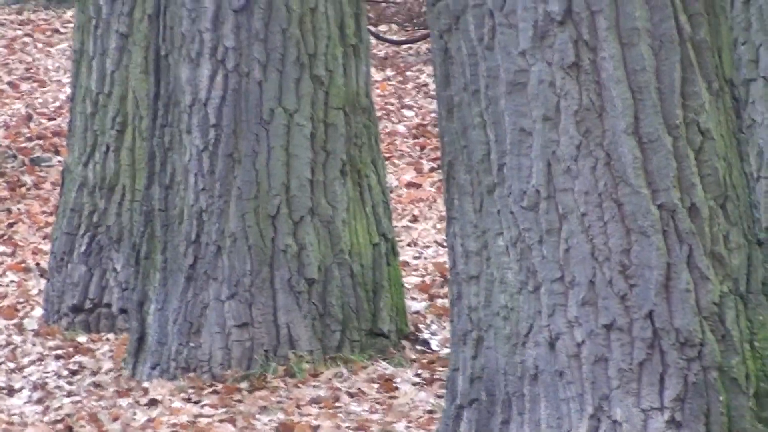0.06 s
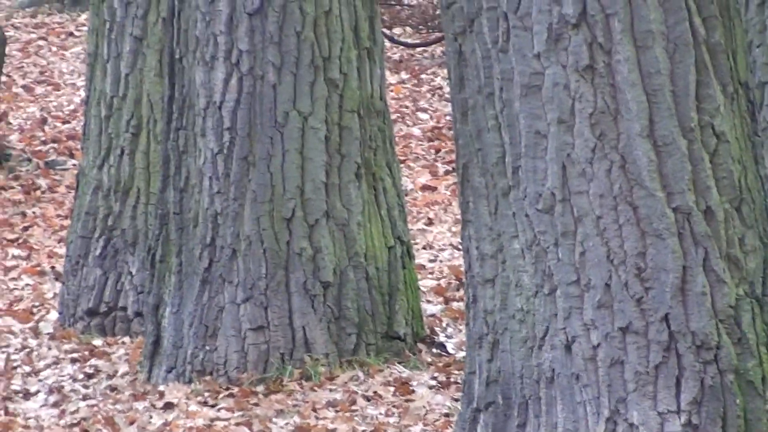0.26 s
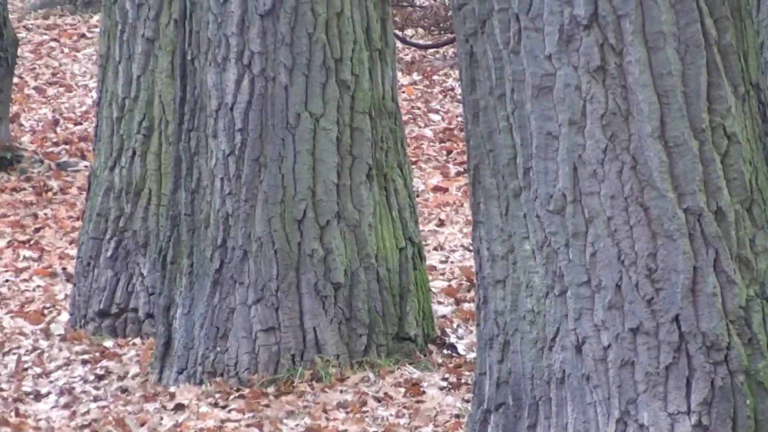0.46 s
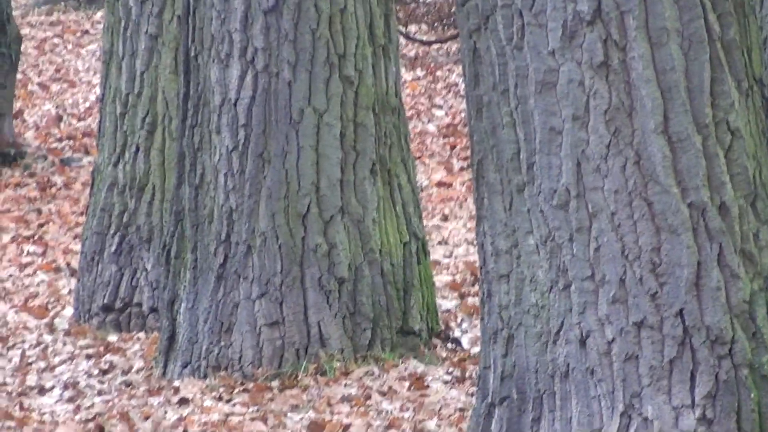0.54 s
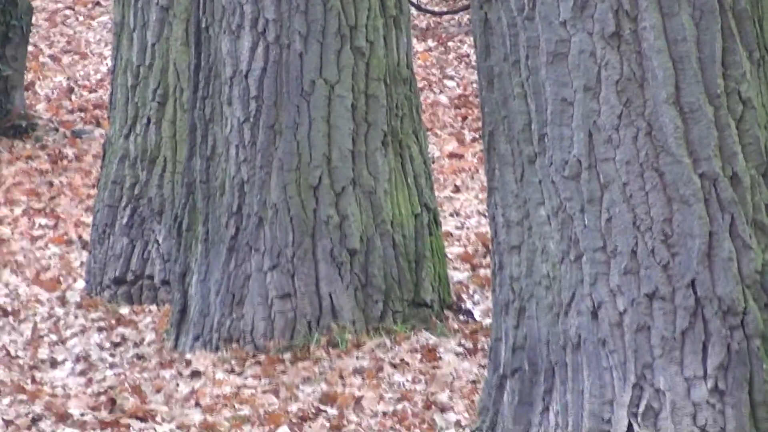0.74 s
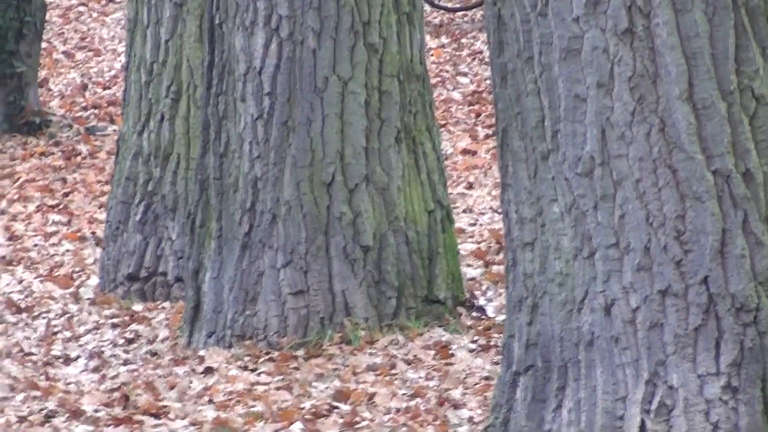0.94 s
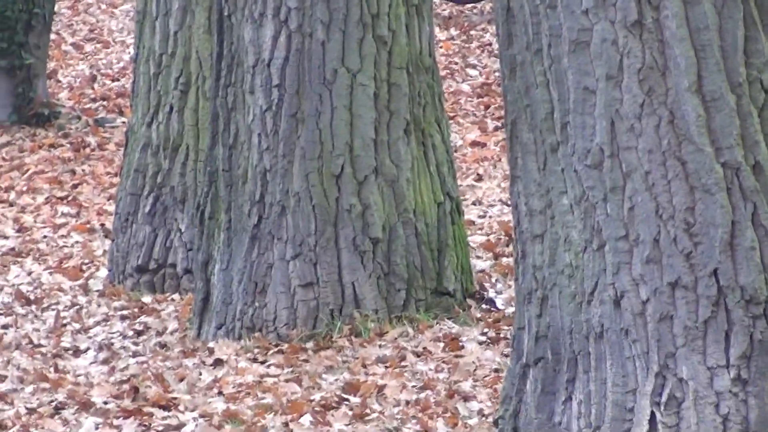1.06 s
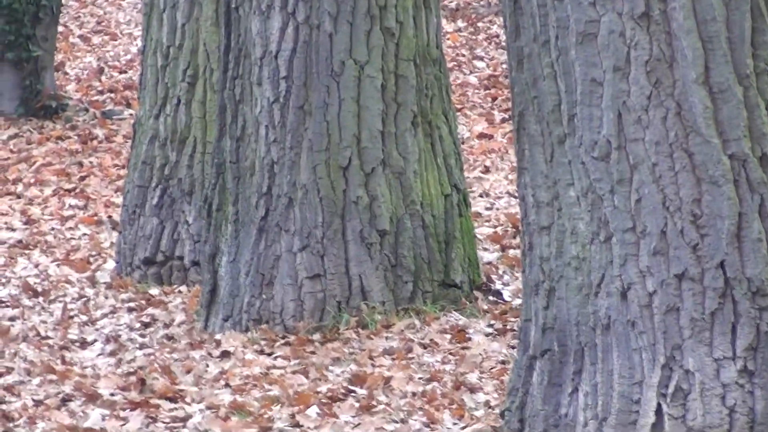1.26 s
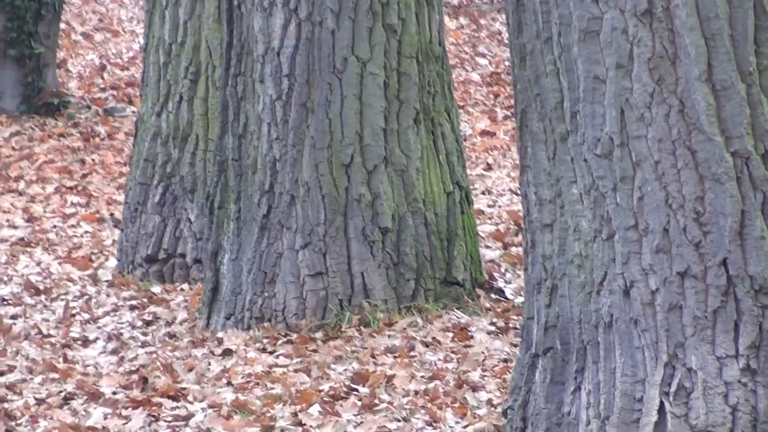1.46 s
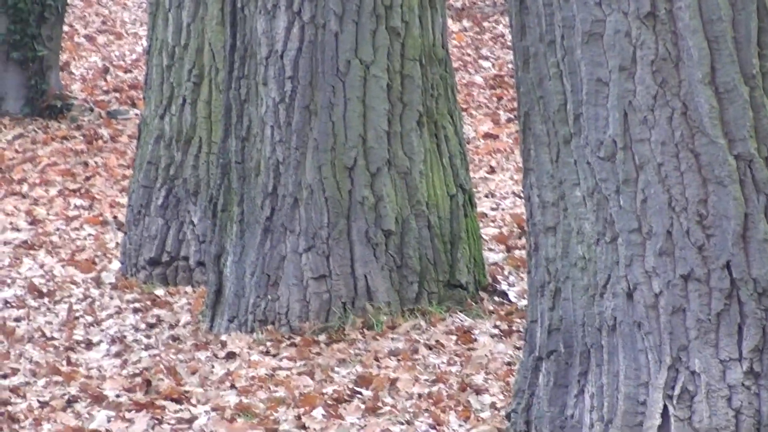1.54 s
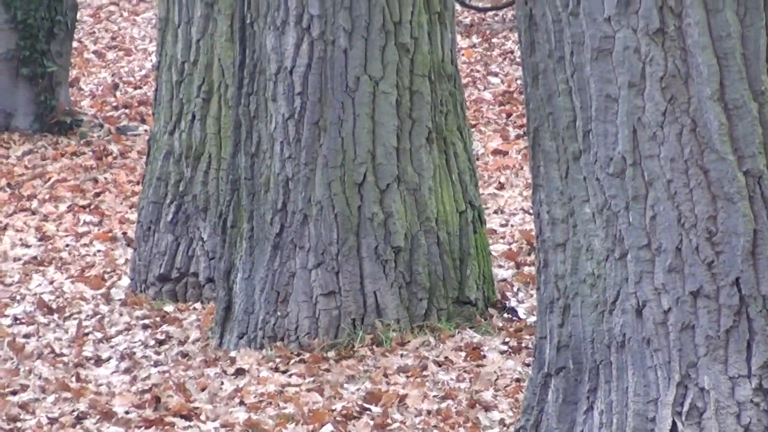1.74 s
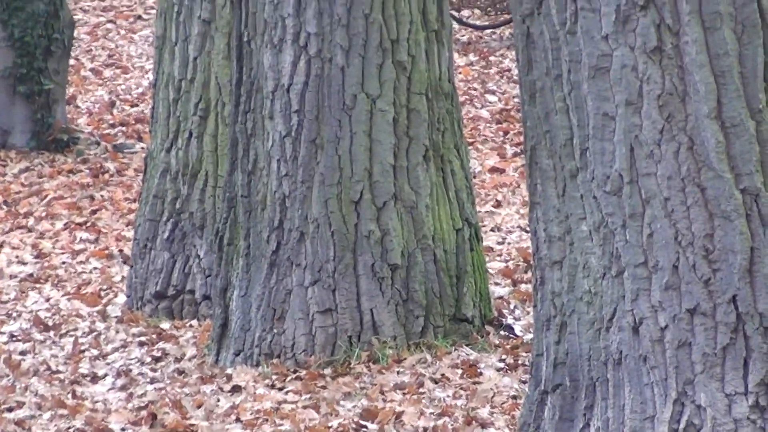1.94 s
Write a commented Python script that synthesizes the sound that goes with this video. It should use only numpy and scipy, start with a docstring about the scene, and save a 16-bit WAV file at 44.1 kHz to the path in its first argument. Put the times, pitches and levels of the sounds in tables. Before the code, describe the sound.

Two high bird calls, each slurring down into a warble, sound fairly near and echo lightly among trees. Two fainter answers and brief peeps follow, over a steady rumble of distant traffic and a faint crackle of dry leaves.

```python
"""Distant traffic rumbles under an autumn wood, and a small bird gives two thin, warbling calls.
Another answers twice from farther off, among a few short notes. Each call is one pure whistle
that slurs down into a warble; trunks scatter it into a fluttering tail. The traffic is swelling
noise over an engine drone, with two soft bumps, a steady hiss and faint ticks of dry leaves."""
import sys
import numpy as np
from scipy import signal
from scipy.fft import rfft, irfft
from scipy.io import wavfile

SR = 44100
rng = np.random.default_rng(int(sys.argv[2]) if len(sys.argv) > 2 else 0)


def output_pcm(signal):
    """Save a mono or channel-first signal as 16-bit PCM at the path in sys.argv[1].

    Samples are clipped to [-1, 1] before scaling.
    """
    pcm = np.clip(np.atleast_2d(signal).T, -1, 1) * 32767
    wavfile.write(sys.argv[1], SR, np.round(pcm).astype(np.int16))


N = 88200
T = np.arange(N) / SR
LEFT_RIGHT = np.array([[1], [-1]])

# stereo lean of the background: f/Hz, left minus right/dB
STEREO_LEAN = [(40, 0.7), (180, 1), (350, 2.5), (700, 2.5), (1400, 0.1), (3000, -0.5)]
# spectrum of the wood's hiss: f/Hz, relative level/dB
HISS_COLOUR = [(20, -24), (400, 15.5), (1000, 11), (1700, 8), (2900, 0.5), (5500, 3), (9000, -1),
               (15500, -4.5)]


def from_db(db):
    """Decibels to gain."""
    return 10 ** (np.asarray(db) / 20)


def rms_one(x):
    """Scale to unit power."""
    return x / np.sqrt(np.mean(x ** 2) + 1e-20)


def along(points, t):
    """Join (time, value) breakpoints with straight lines."""
    return np.interp(t, *np.transpose(points))


def at_hz(points, hz):
    """Read a curve on a log-frequency axis."""
    f, value = np.transpose(points)
    return np.interp(np.log(hz + 1), np.log(f), value)


def lean(hz):
    """Left and right gains that tip the lows and mids slightly left."""
    return from_db(LEFT_RIGHT * at_hz(STEREO_LEAN, hz) / 2)


def drift(rate_hz):
    """A smooth random modulator of unit power."""
    hop, settle = 40, 2000
    pole = np.exp(-2 * np.pi * rate_hz * hop / SR)
    white = rng.standard_normal(N // hop + settle + 2)
    slow = signal.lfilter([1], [1, -2 * pole, pole * pole], white)[settle:]
    return np.interp(np.arange(N) / hop, np.arange(len(slow)), rms_one(slow))


def noise(colour):
    """Coloured stereo noise of unit power, widest in the midrange."""
    # stereo width: f/Hz, side minus mid/dB
    width = [(40, -23), (90, -39), (180, -27), (350, -18.5), (700, -9.5), (1400, -5), (2800, -5),
             (5500, -8), (9000, -15), (14000, -28)]
    hz = np.arange(N // 2 + 1) * SR / N
    mid, side = rfft(rng.standard_normal((2, N)))
    stereo = (mid + LEFT_RIGHT * side * from_db(at_hz(width, hz))) * lean(hz)
    return rms_one(irfft(stereo * from_db(at_hz(colour, hz)), N))


def band(x, low_hz, high_hz):
    """Band-pass and bring to unit power."""
    sos = signal.butter(2, [low_hz, high_hz], "band", fs=SR, output="sos")
    return rms_one(signal.sosfilt(sos, x))


def burst(start, t60, rise_s):
    """An envelope with a quick rise and an exponential fall."""
    age = np.maximum(T - start, 0)
    return np.minimum(age / rise_s, 1) * np.exp(-np.log(1000) * age / t60)


def hum(tones, width_hz):
    """Narrow tones that waver in strength and phase."""
    out = 0
    for hz, db in tones:
        phase = 2 * np.pi * hz * T
        tone = drift(width_hz) * np.sin(phase) + drift(width_hz) * np.cos(phase)
        out = out + from_db(db) * tone * lean(hz)
    return out


def traffic():
    """Distant traffic: a deep rumble, an engine drone and a ringing road roar that swells late."""
    # fader rides of the rumble and the roar: t/s, relative level/dB
    rumble_ride = [(0.0, -46.5), (0.36, -50.5), (0.44, -41), (0.72, -51.5), (0.87, -47), (1.17, -45.5),
                   (1.29, -43), (1.43, -48), (1.64, -42.5), (2.0, -46)]
    roar_ride = [(0.0, -50.5), (0.1, -48), (0.4, -50.5), (0.42, -44), (0.63, -53.5), (0.82, -48.5),
                 (1.15, -55.5), (1.23, -48.5), (1.77, -42), (2.0, -46)]
    # their spectra: f/Hz, relative level/dB
    rumble_colour = [(20, -55), (35, -18), (55, -13.5), (110, -10), (160, -3), (215, 2.5), (290, -1.5),
                     (370, -14), (600, -18), (3000, -84)]
    roar_colour = [(60, -40), (250, -9.5), (390, 2), (440, -0.5), (510, 1), (560, -7.5), (610, -3),
                   (700, -4.5), (790, -9.5), (1000, -15), (1500, -29.5), (3000, -29), (16000, -85)]
    # ringing in the roar: f/Hz, level against the roar/dB
    roar_tones = [(400, -9), (477, -6.5)]
    # engine harmonics: f/Hz, level/dB
    engine_tones = [(73, -59), (144, -57.5), (218, -63)]
    rumble = from_db(along(rumble_ride, T) - 0.26) * noise(rumble_colour)
    road = noise(roar_colour) + hum(roar_tones, width_hz=12.7)
    roar = from_db(along(roar_ride, T) - 0.84) * road
    return rumble + roar + hum(engine_tones, width_hz=11.4)


def wood_hiss():
    """The steady, soft noise bed of the wood."""
    return from_db(-51.5) * noise(HISS_COLOUR)


def leaf_crackle():
    """Dry leaf litter crackles faintly: tiny grains of hiss at random moments."""
    grains_per_s, decay_s, level_db = 45, 0.0022, -64.5
    onsets = (rng.random(N) < grains_per_s / SR) * rng.uniform(0.33, 1, N)
    envelope = signal.lfilter([1], [1, -np.exp(-1 / (decay_s * SR))], onsets + 1e-18)
    return from_db(level_db) * band(envelope * noise(HISS_COLOUR), low_hz=3020, high_hz=6600)


def whistle(start, length, hz, db):
    """A bird's pure, slightly wavering tone with a soft attack and release."""
    attack_s, release_s, waver_hz = 0.0076, 0.0058, 37.8
    gate = np.clip((T - start) / attack_s, 0, 1) * np.clip((start + length - T) / release_s, 0, 1)
    phase = 2 * np.pi * np.cumsum(hz + waver_hz * drift(rate_hz=123)) / SR
    return np.sqrt(2) * from_db(db) * np.sin(gate * np.pi / 2) ** 2 * np.sin(phase)


def call(start, length, pitch, rate, dip_at, dip_hz, db, slur, depth_hz, throb_db):
    """A whistle slurs down into a first dip and warbles on, louder at the top of each warble."""
    warble_onset_s, dip_width_s = .016, .006
    age = T - start
    since_dip = age - dip_at
    warble = np.clip(1 + since_dip / warble_onset_s, 0, 1) * np.cos(2 * np.pi * rate * since_dip)
    first_dip = dip_hz * np.exp(-(since_dip / dip_width_s) ** 2)
    hz = pitch * along(slur, age) - depth_hz * warble - first_dip
    return whistle(start, length, hz, db - throb_db * warble)


def trunk_echoes(x, t60):
    """Many separate reflections off trunks, dying away, nearly alike in both channels."""
    echoes_per_s, predelay_s, side_db = 1500, 0.0027, -13
    taps = rng.standard_normal((2, N)) * (rng.random(N) < echoes_per_s / SR)
    taps *= burst(predelay_s, t60, rise_s=0.001)
    taps /= np.sqrt(np.sum(taps ** 2, axis=1, keepdims=True))
    mid, side = signal.fftconvolve(x[None], taps, axes=1)[:, :N]
    return mid + from_db(side_db) * side * LEFT_RIGHT


def in_wood(x, scatter_db, tail_db):
    """Direct sound, early scatter from nearby trunks and the wood's long, duller tail."""
    tail_top_hz = 7170
    dull = signal.sosfilt(signal.butter(10, tail_top_hz, fs=SR, output="sos"), x)
    scatter = from_db(scatter_db) * trunk_echoes(x, t60=0.12)
    tail = from_db(tail_db) * trunk_echoes(dull, t60=0.83)
    return x + scatter + tail


def near_bird():
    """Two clear calls, each a high slur falling into a wide warble."""
    # calls: t/s, length/s, f/Hz, warble rate/Hz, first dip after the start/s, extra dip depth/Hz
    calls = [(.212, .164, 6795, 32.2, .0632, 260), (.700, .173, 6735, 31.4, .066, 20)]
    # pitch contour: t/s into the call, ratio to its pitch
    slur = [(0, 1.066), (.009, 1.1), (.018, 1.119), (.028, 1.108), (.041, 1.026), (.052, 1.004),
            (.064, .98), (.08, 1.014), (.105, 1.0), (.16, .992)]
    # loudness contour, one per call: t/s, level/dB
    efforts = [
        [(.212, -31), (.226, -34), (.241, -27.5), (.256, -34.5), (.277, -37.5), (.293, -27), (.306, -29.5),
         (.319, -21.5), (.337, -24.5), (.357, -21), (.374, -33)],
        [(.701, -29), (.712, -27), (.728, -24.5), (.755, -33.5), (.78, -29), (.815, -30), (.858, -32.5),
         (.869, -32)],
    ]
    song = sum(call(*row, along(effort, T), slur, depth_hz=335, throb_db=0.45)
               for row, effort in zip(calls, efforts))
    return in_wood(song, scatter_db=-13, tail_db=-13)


def soft_bumps():
    """Two dull bumps: low-mid noise that rises quickly and dies away."""
    # bumps: t/s, level/dB, t60/s
    hits = [(0.411, -40.5, 0.46), (1.227, -46, .35)]
    # their spectrum: f/Hz, relative level/dB
    colour = [(40, -25), (150, -8), (330, 20), (700, -26), (1250, -0.5), (2200, -28), (8000, -33)]
    return sum(from_db(db) * burst(start, t60, rise_s=0.0067) for start, db, t60 in hits) * noise(colour)


def leaf_ticks():
    """Dry leaves: short bursts of band noise tick, longer ones rustle."""
    # ticks and rustles: t/s, level/dB, low f/Hz, high f/Hz, t60/s
    ticks = [(.411, -45, 960, 1400, 0.067), (.508, -49.5, 916, 2070, 0.17), (.524, -45, 3500, 13000, 0.027),
             (.717, -37.5, 1940, 10500, 0.04), (0.741, -51.5, 2500, 7730, 0.49),
             (1.236, -56, 1200, 4000, 0.41)]
    return sum(from_db(db) * burst(start, t60, rise_s=.002) * band(rng.standard_normal(N), low, high)
               for start, db, low, high, t60 in ticks)


def short_notes():
    """Brief contact notes, each a single glide; the farthest arrive mostly as scatter."""
    # notes: t/s, length/s, first f/Hz, last f/Hz, direct level/dB, scatter send/dB
    notes = [(0.62, 0.036, 7750, 7300, -58, 4.5), (1.065, 0.016, 6950, 7020, -42, -17),
             (1.202, 0.07, 7700, 7350, -60, 2), (1.317, 0.024, 7100, 7075, -40, -3.5),
             (1.365, 0.0276, 8070, 7030, -59, 4.5), (1.815, 0.017, 7050, 6980, -50, -8)]
    out = 0
    for start, length, first_hz, last_hz, db, scatter_db in notes:
        glide = np.interp(T, [start, start + length], [first_hz, last_hz])
        out = out + in_wood(whistle(start, length, glide, db), scatter_db, tail_db=-9)
    return out


def far_bird():
    """Two faint, throbbing answers, blurred by the trees."""
    # calls: t/s, length/s, f/Hz, warble rate/Hz, first dip after the start/s, extra dip depth/Hz,
    # direct level/dB
    calls = [(1.062, 0.166, 6660, 33.5, 0.0305, 50, -52.5), (1.633, 0.15, 6620, 35.5, .031, 30.4, -47)]
    # pitch contour: t/s into the call, ratio to its pitch
    slur = [(0, 1.018), (.012, 1.04), (.03, 1.002), (.15, .997)]
    song = sum(call(*row, slur, depth_hz=208, throb_db=4.5) for row in calls)
    return in_wood(song, scatter_db=-6, tail_db=-6)


def scene():
    """Birds over traffic, bumps, leaves and the hiss of the wood."""
    birds = near_bird() + far_bird() + short_notes()
    return birds + traffic() + soft_bumps() + leaf_ticks() + wood_hiss() + leaf_crackle()


def record(dry):
    """A steep low-pass takes off the very top."""
    cutoff_hz = 15900
    return signal.sosfilt(signal.ellip(12, .1, 80, cutoff_hz, fs=SR, output="sos"), dry)


dry = scene()
out = record(dry)
output_pcm(out)
```